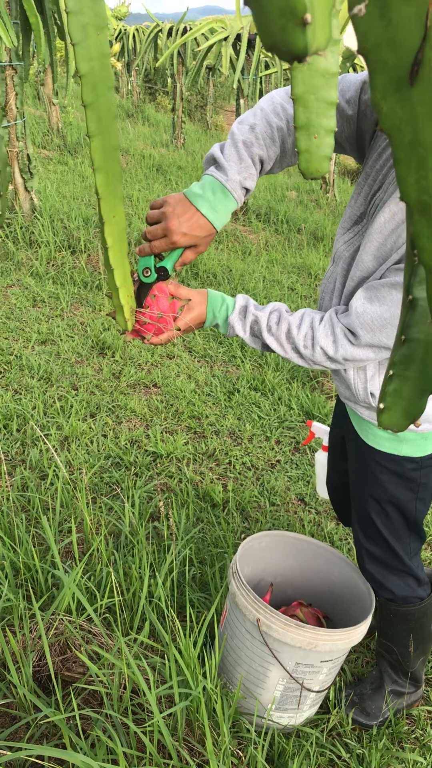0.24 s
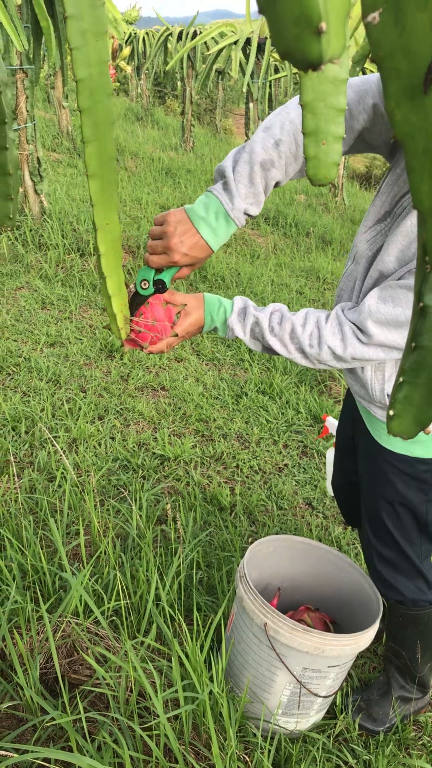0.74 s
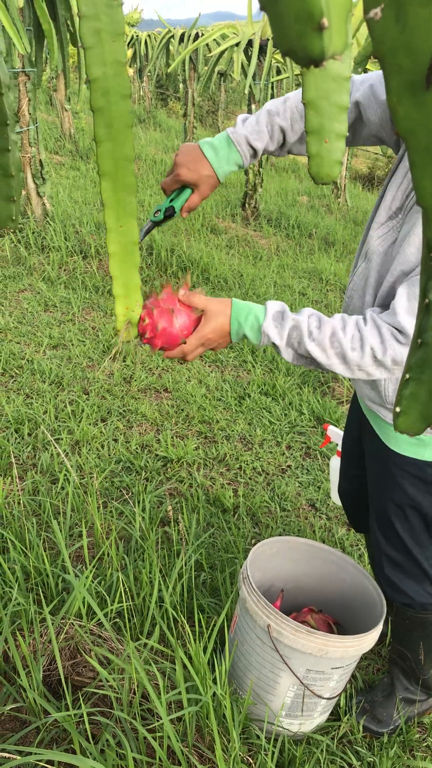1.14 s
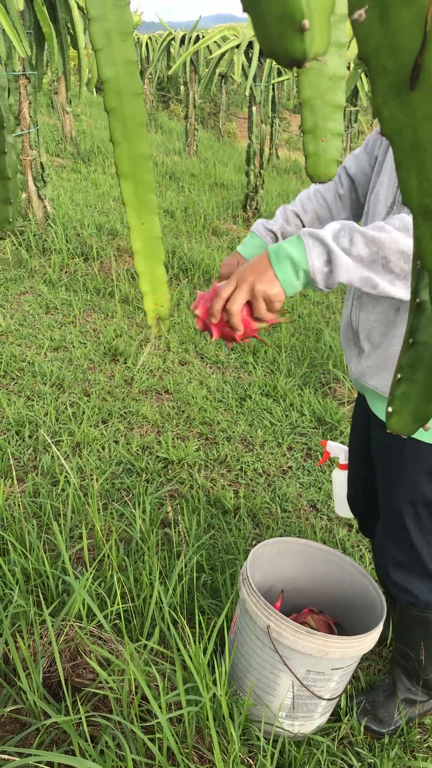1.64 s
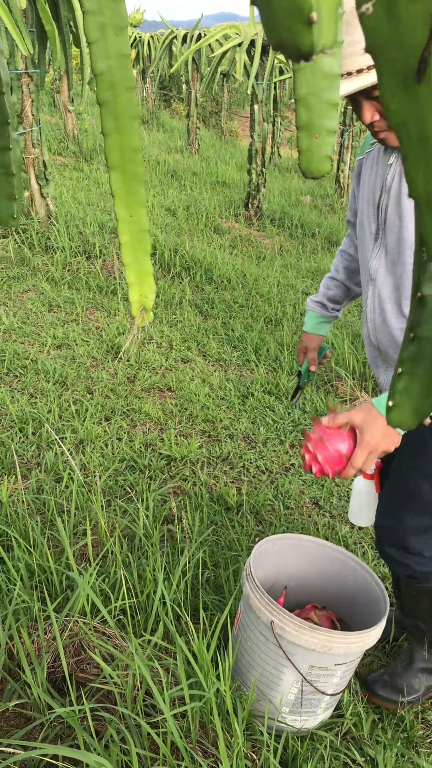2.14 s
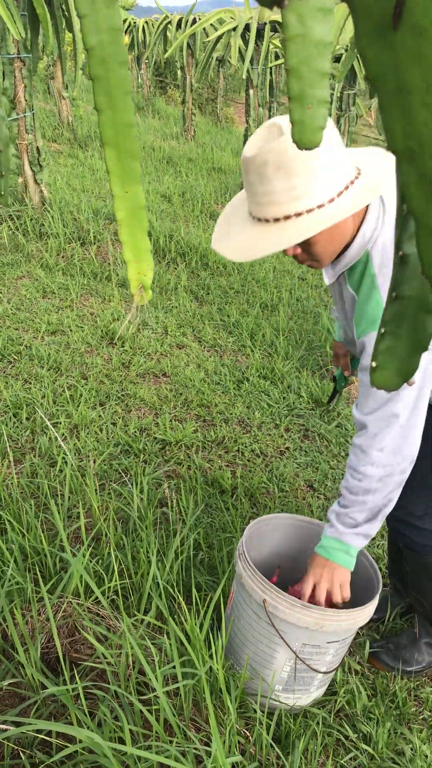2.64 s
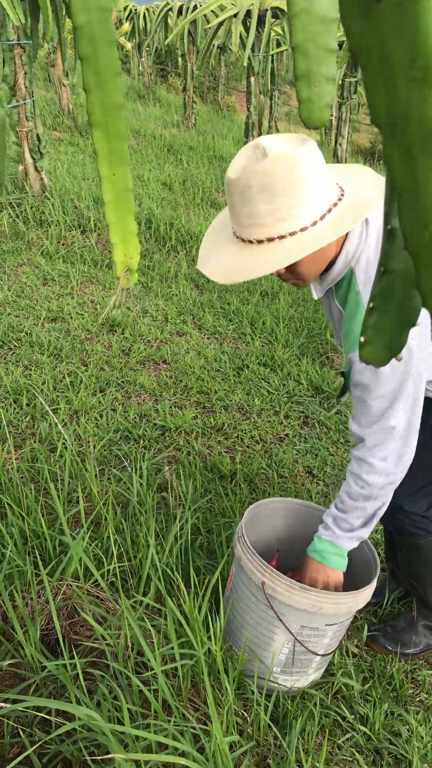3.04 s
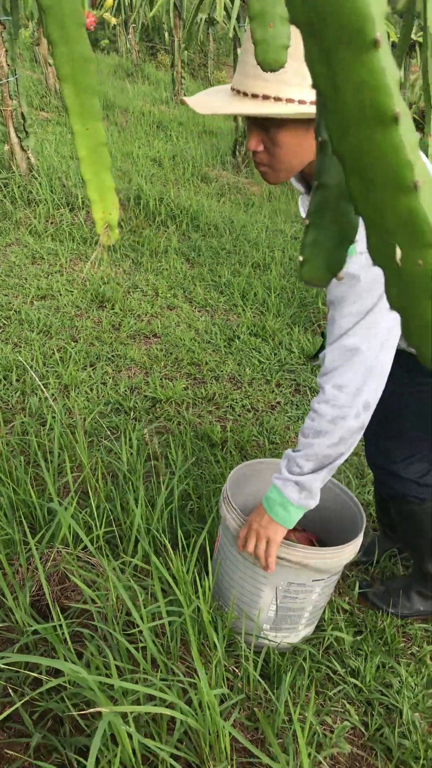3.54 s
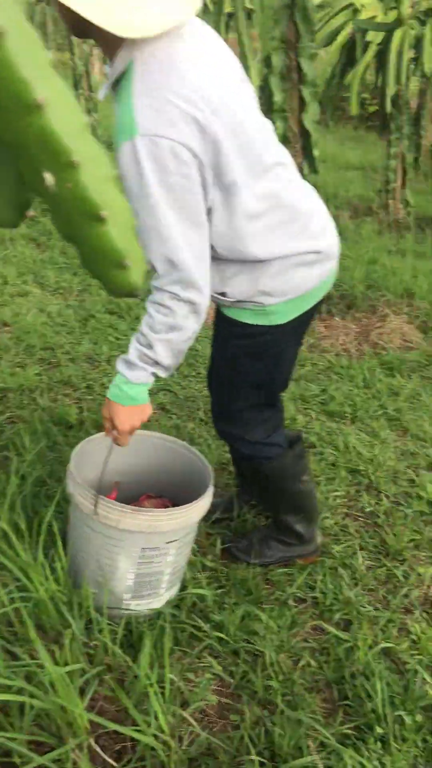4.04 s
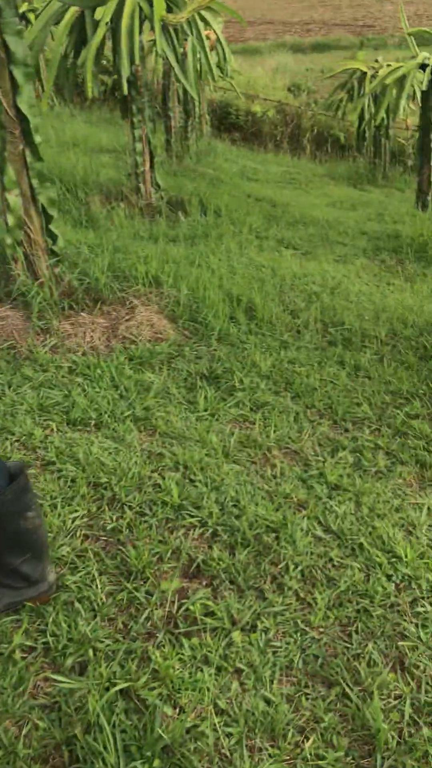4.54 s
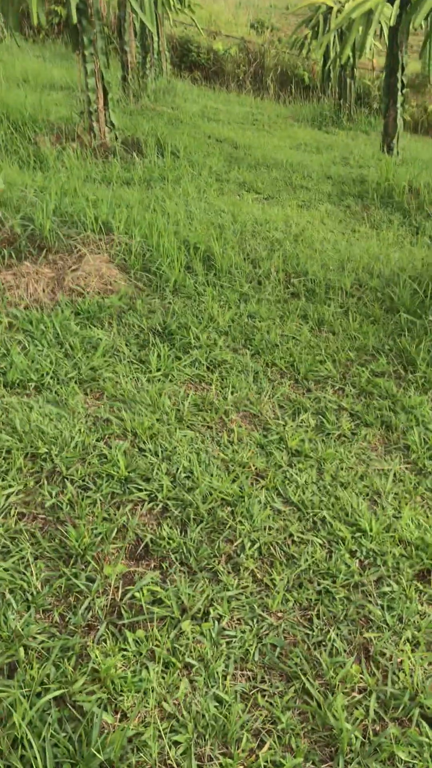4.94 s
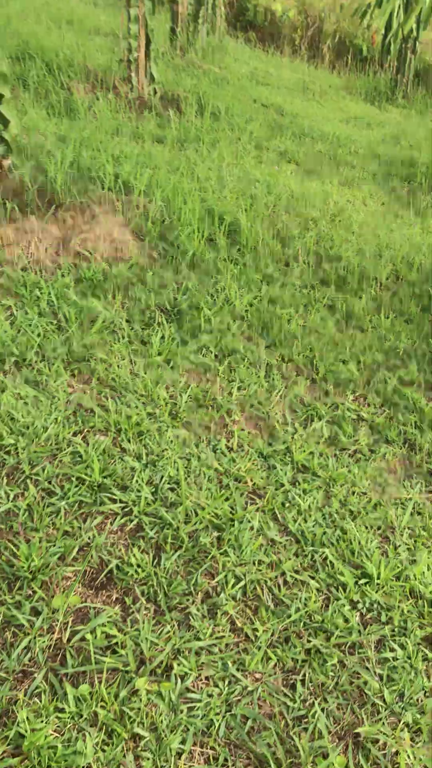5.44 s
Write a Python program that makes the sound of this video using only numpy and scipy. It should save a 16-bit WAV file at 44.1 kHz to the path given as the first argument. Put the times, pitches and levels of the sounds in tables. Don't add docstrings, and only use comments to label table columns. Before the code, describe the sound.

Close, effectively mono outdoor sound: low wind puffs and thin insect buzz, then a crisp snip in two stages. Three bright chirp-and-trill bird calls follow, echoing lightly among plant rows. Small plastic taps and hand rubs come from a bucket, then firmer knocks as it is lifted, a hollow bump against a boot, and growing grass brushing with dry snaps to the end.

```python
import sys
import numpy as np
from scipy import signal
from scipy.fft import rfft, irfft, next_fast_len
from scipy.io import wavfile
from scipy.ndimage import map_coordinates

SR = 44100
rng = np.random.default_rng(int(sys.argv[2]) if len(sys.argv) > 2 else 0)


def voltage_ratio(level):
    return 10 ** (np.asarray(level, float) / 20)


def unload_wav(signal):
    wavfile.write(
        sys.argv[1],
        SR,
        np.round(np.clip(np.atleast_2d(signal).T, -1, 1) * 32767).astype(np.int16),
    )


N = 251350


def unit(x):
    return x / np.sqrt(np.mean(x ** 2) + 1e-20)


def peak(x):
    return x / np.abs(x).max()


def along(points, hz):
    f, v = np.transpose(points)
    return np.interp(np.log(hz + 1), np.log(f + 1), v)


def curves(points):
    s, *cols = np.transpose(points)
    return [np.interp(np.arange(N) / SR, s, c) for c in cols]


def wobble(rate, size=N):
    knots = rng.standard_normal(int(N * rate / SR) + 4)
    return map_coordinates(knots, [np.arange(size) * rate / SR])


def swells(at_s, rise_s, fall_s, db):
    t = np.arange(0, N + 64, 64) / SR
    at_s, rise_s, fall_s, db = (np.reshape(v, (-1, 1)) for v in (at_s, rise_s, fall_s, db))
    late = t - at_s
    slope = np.where(late < 0, -late / rise_s, late / fall_s)
    power = np.sum(voltage_ratio(db - 10 * slope) ** 2, axis=0)
    return np.interp(np.arange(N) / SR, t, np.sqrt(power))


def filtered(x, response):
    m = next_fast_len(len(x) + 8192)
    return irfft(rfft(x, m) * response(np.fft.rfftfreq(m, 1 / SR)), m)[:len(x)]


def resonance(centre_hz, width_hz):
    return lambda f: 1j * f * width_hz / (centre_hz ** 2 - f * f + 1j * f * width_hz)


def hiss(spectrum, grain_db=0):
    white = rng.standard_normal(N) * voltage_ratio(grain_db * wobble(900))
    return unit(filtered(white, lambda hz: voltage_ratio(along(spectrum, hz))))


def burst(t, t60):
    return voltage_ratio(-60 * t / t60) * rng.standard_normal(len(t))


def add(track, s, sound):
    part = track[round(s * SR):][:len(sound)]
    part += sound[:len(part)]


def rows(x, gap, decay):
    # (f/Hz, t60/s)
    row_t60 = [(1000, 0.24), (3000, 0.27), (8000, 0.2)]
    hz, t, z = signal.stft(rng.standard_normal(SR), SR, nperseg=256)
    fading = z * voltage_ratio(-60 * t / (decay * along(row_t60, hz)[:, None]))
    tail = signal.istft(fading, SR, nperseg=256)[1]
    return signal.fftconvolve(np.pad(x, (round(gap * SR), 0)), tail / np.linalg.norm(tail))[:N]


def wind():
    # (t/s, level/dB)
    breeze = [(0, -56), (.62, -59), (.71, -72), (1.0, -65), (2.4, -70), (3.1, -69), (3.4, -62), (4.1, -67),
              (4.4, -60), (5.7, -65)]
    # (t/s, level/dB)
    puffs = [(.14, -47), (.24, -52), (.4, -49), (.54, -56), (.63, -50), (1.05, -60), (1.38, -60),
             (1.63, -54), (1.75, -53), (1.99, -53), (2.12, -60), (2.62, -58), (2.79, -57), (2.93, -54),
             (3.27, -55), (3.36, -57), (3.65, -54), (3.7, -51), (4.05, -60), (4.22, -57), (4.53, -57),
             (5.03, -57), (5.15, -56), (5.3, -58), (5.46, -54), (5.65, -57)]
    # (f/Hz, density/dB)
    rumble = [(15, -44), (25, 1), (68, -2.5), (151, -16.5), (249, -41), (400, -46), (520, -87), (880, -120)]
    # (f/Hz, density/dB)
    air = [(30, -5), (100, 2), (400, -13.5), (1000, -23.5), (3000, -22), (6000, -31), (9500, -43),
           (15500, -35)]
    s, db = np.transpose(puffs)
    pressure = voltage_ratio(curves(breeze)[0]) + swells(s, .03, .045, db)
    return pressure * unit(voltage_ratio(1.4 * wobble(20)) * hiss(rumble)) + voltage_ratio(-67) * hiss(air)


def insects():
    # (t/s, low buzz/dB, high buzz/dB)
    buzz_levels = [(0, -70, -70), (1.2, -69, -68.5), (2.5, -70.5, -69.5), (3.7, -73.5, -68),
                   (4.2, -77, -73), (5.7, -115, -93)]
    t, out = np.arange(N) / SR, 0
    low = lambda f: abs(resonance(7310, 260)(f)) ** 2 + .6 * abs(resonance(7800, 700)(f)) ** 2
    high = lambda f: abs(resonance(10800, 500)(f)) ** 2 + .6 * abs(resonance(11100, 1300)(f)) ** 2
    for db, band, wing_hz, depth_db in zip(curves(buzz_levels), (low, high), (55.7, 125.6), (3, 4.3)):
        beat = voltage_ratio(depth_db * np.sin(2 * np.pi * wing_hz * t + .5 * wobble(1.1)))
        out = out + voltage_ratio(db) * unit(filtered(beat * rng.standard_normal(N), band))
    return out


def whistles(notes, bend, overtone_db, flutter_db, waver):
    out, unsteady = np.zeros(N), 1 + waver * wobble(220)
    for s, length, first_hz, last_hz, db in notes:
        u = np.linspace(0, 1, round(length * SR))
        glide = last_hz + (first_hz - last_hz) * (1 - u) ** bend
        phase = 2 * np.pi * np.cumsum(glide * unsteady[round(s * SR):][:len(u)]) / SR
        soft_ends = np.sqrt(np.abs(np.sin(np.pi * u)))
        add(out, s, voltage_ratio(db) * soft_ends * (np.sin(phase) + voltage_ratio(overtone_db) * np.sin(2 * phase)))
    return out * voltage_ratio(flutter_db * wobble(260))


def far_notes():
    # (t/s, length/s, first f/Hz, last f/Hz, level/dB)
    far_calls = [(0.005, 0.036, 1900, 2450, -68), (.075, 0.017, 2790, 2710, -60),
                 (.135, .035, 2420, 2800, -63), (.168, .066, 2850, 3720, -64),
                 (.152, .015, 3900, 4100, -70.5), (.40, .045, 1130, 1110, -75),
                 (1.555, .025, 3200, 3520, -73), (1.61, 0.029, 2680, 3100, -75),
                 (1.63, .01, 4350, 4170, -68), (1.66, 0.026, 3400, 3600, -69),
                 (2.63, 0.085, 2500, 3730, -68.5), (2.701, 0.022, 2150, 2050, -55.5),
                 (2.724, .014, 2080, 1750, -60), (2.71, .035, 2450, 2750, -68),
                 (2.69, .016, 950, 1000, -70), (2.745, 0.03, 2800, 2720, -67),
                 (2.775, 0.028, 2680, 1800, -65), (2.985, 0.045, 3100, 3100, -66),
                 (3.092, 0.027, 3100, 3100, -69), (3.678, 0.036, 2850, 3330, -61),
                 (.015, .03, 3100, 3200, -71), (.12, .016, 2380, 2300, -68), (.14, .02, 3000, 3600, -74),
                 (.19, .06, 2950, 3000, -74), (.372, .016, 2700, 3900, -69), (.37, .012, 4120, 4000, -70),
                 (.49, .03, 1130, 1110, -76), (1.362, .018, 2750, 2900, -71), (3.495, .03, 3500, 3200, -71),
                 (3.615, .025, 3400, 3500, -68), (3.657, .016, 2550, 2700, -72),
                 (.384, .07, 3950, 3560, -69), (.465, .03, 3400, 2500, -76), (.694, .022, 2600, 4050, -69),
                 (.709, .034, 4050, 4080, -65), (.747, .018, 4100, 4000, -68),
                 (2.703, .018, 3500, 3950, -66), (2.915, .085, 1500, 1480, -74),
                 (2.735, .012, 1050, 950, -69)]
    # (t/s, notes, first level/dB)
    runs = [
        (2.155, 6, -65),
        (2.643, 4, -67),
    ]
    # (t/s, length/s, f/Hz, level/dB)
    thin_notes = [(2.39, .033, 12100, -70), (2.45, .049, 12300, -73), (2.53, .03, 12800, -73),
                  (2.545, .05, 12100, -73)]
    # (t/s, level/dB)
    sharp_notes = [(4.015, -57), (4.098, -56), (4.156, -56)]
    gap_s, note_s, first_hz, top_hz, fall, swell_db = .0155, .009, 2500, 2950, .89, 1.2
    chatter = []
    for s, notes, db in runs:
        for k in range(notes):
            hz = top_hz - (top_hz - first_hz) / 2 ** k
            chatter.append((s + k * gap_s, note_s, hz, hz * fall, db + k * swell_db))
    peeps = [(s, length, hz, hz, db) for s, length, hz, db in thin_notes]
    tsips = [(s, .01, 7800, 6700, db) for s, db in sharp_notes]
    return far_calls + chatter + peeps + tsips


def sung(motif, calls):
    return [(s + delay, length, first * ratio, last * ratio, db + contrast * note_db)
            for s, ratio, db, contrast in calls for delay, length, first, last, note_db in motif]


def birds():
    # (delay/s, length/s, first f/Hz, last f/Hz, level/dB)
    chip = [(0, .009, 2200, 2950, -1), (-.002, .012, 3400, 4300, -12), (.008, .011, 2800, 1950, 0),
            (.017, .017, 1860, 1760, -1.5)]
    drop_motif = [(0, .01, 2620, 2090, 0), (.0105, .014, 1950, 1360, -6)]
    trill = [(0, .009, 2950, 2600, -7), (.0145, .012, 3450, 2850, 0), (.03, .012, 3600, 2900, -1),
             (.045, .011, 3550, 2800, 0), (.055, .012, 2950, 2290, 0)]
    # (t/s, pitch ratio, level/dB, contrast between its notes)
    chip_calls = [(1.047, 1.01, -61, 1.1), (1.318, 1.01, -59, .8)]
    drop_calls = [
        (1.628, .85, -59, -.9),
        (1.944, 1.01, -47, 1.1),
        (2.245, 1.01, -47.5, 1.1),
    ]
    trill_calls = [(1.687, .975, -49, 1.1), (1.998, 1.01, -45.5, 1.2), (2.296, 1.03, -44, .8)]
    # (delay/s, level/dB)
    early_echoes = [(.0037, -6), (.0079, -8.5), (0.031, -14), (.019, -10)]
    song = sung(chip, chip_calls) + sung(drop_motif, drop_calls) + sung(trill, trill_calls)
    near = whistles(song, 1.05, -33, 1.7, .016)
    far = whistles(far_notes(), 1.1, -26, 2.2, .014)
    early = sum(voltage_ratio(db) * np.roll(near, round(delay * SR)) for delay, db in early_echoes)
    scattered = voltage_ratio(-1.5) * rows(near * unit(1 + 1.6 * wobble(520)), .003, decay=.9)
    hillside = voltage_ratio(-19) * rows(near, .037, decay=14.0)
    answer = filtered(early + scattered + hillside, lambda f: resonance(2800, 4400)(f) ** 2)
    far_echo = voltage_ratio(-2.5) * rows(far * unit(1 + 1.2 * wobble(400)), .0022, decay=.9)
    return near + answer + far + far_echo


def friction(strokes):
    out = np.zeros(N)
    for s, length, hz, width_hz, db in strokes:
        stroke = np.hanning(round(length * SR)) ** 0.26
        grit = rng.standard_normal(len(stroke)) * voltage_ratio(4.9 * wobble(165, size=len(stroke)))
        add(out, s, voltage_ratio(db) * stroke * unit(filtered(grit, lambda f: resonance(hz, width_hz)(f) ** 2)))
    return out


def scrapes():
    # (t/s, length/s, f/Hz, width/Hz, level/dB)
    slides = [(0, 0.043, 1310, 1500, -68), (2.925, .045, 620, 200, -66), (2.98, 0.13, 1400, 700, -72),
              (3.08, 0.036, 590, 201, -71), (3.146, 0.17, 1340, 500, -72), (3.388, 0.051, 290, 150, -62.5),
              (3.553, 0.046, 1170, 710, -60.5), (3.675, 0.016, 940, 200, -56), (4.54, 0.18, 252, 70, -68)]
    return friction(slides)


def shears():
    # (t/s, flesh/dB, steel/dB, edge over blade/dB, crumble t60/s)
    snips = [(.6137, -30, -19, -10, .015), (.6152, -36, -29, -8, .015), (.6169, -24, -25, -5, .035),
             (.7684, -40, -18, -17, .012), (.8193, -64, -35, -8, .012), (.8332, -58, -50, 0, .02),
             (.8345, -47, -31, -3, .015), (.8364, -38, -25, -3, .015), (.8383, -28, -28, 2, .012),
             (.8388, -27, -20, 1, .012), (.8404, -14, -19, -1, .02), (.8418, -26, -26, -2, .02),
             (.8431, -29, -25, 5, .012), (.8436, -21, -23, 6, .012), (.8442, -23, -23, -3, .04),
             (1.5102, -38, -35, -4, .035)]
    # (f/Hz, width/Hz, radiation/dB)
    bodies = [
        (1000, 1100, -2),
        (2900, 1300, -3.5),
        (7000, 3000, -6.5),
        (13200, 6000, 1.5),
    ]
    # (f/Hz, level/dB, t60/s)
    palm = [
        (215, -50, .16),
        (380, -41, .07),
    ]
    out, t = np.zeros(N), np.arange(SR // 10) / SR
    soft_onset = 1 - np.exp(-t / .0015)
    for s, flesh_db, steel_db, edge_db, crumble in snips:
        part_db = flesh_db - 22, flesh_db, steel_db, steel_db + edge_db
        crack = voltage_ratio(-60 * t / .002) * np.sign(rng.standard_normal(len(t)))
        fibres = rng.standard_normal(len(t))
        snap = crack + voltage_ratio(-15 - 60 * t / crumble) * fibres
        squash = voltage_ratio(-60 * t / .035) * soft_onset * fibres
        forces = squash, snap, -snap, snap
        for part, db, force, body in zip(("fruit", "stem", "blade", "edge"), part_db, forces, bodies):
            hz, width_hz, radiation_db = body
            if part == "stem" and s < .8:
                hz = hz * .76
            ring = filtered(force, lambda f: resonance(hz, width_hz)(f) * resonance(hz, 2 * width_hz)(f))
            add(out, s, voltage_ratio(db + radiation_db + 3.5) * peak(ring))
    thump = sum(voltage_ratio(db - 60 * t / t60) * np.sin(2 * np.pi * hz * t) for hz, db, t60 in palm)
    add(out, .842, thump * soft_onset * np.cos(5 * np.pi * t))
    return out


def cracks():
    # (t/s, peak/dB, low f/Hz, high f/Hz, t60/s)
    broad_snaps = [(.927, -42, 650, 3000, .016), (2.8505, -54, 2200, 7000, .006), (2.912, -55, 1200, 6000, .008),
                   (2.949, -50, 2200, 7000, .01), (3.007, -50, 900, 2600, .012), (3.037, -52, 900, 4200, .012),
                   (3.1114, -46, 3000, 7500, .01), (3.161, -59, 1100, 1700, .015),
                   (3.181, -57, 1100, 2000, .012), (3.383, -56, 1000, 9000, .006),
                   (3.402, -46, 1900, 3000, .012), (3.4592, -39, 1500, 2700, .016),
                   (3.556, -54, 2000, 3200, .02), (3.574, -52, 2000, 3200, .02), (3.7315, -39, 1200, 2900, .015),
                   (3.75, -44, 3200, 4200, .014), (4.205, -48, 1300, 2700, .02), (4.409, -44, 900, 4600, .01),
                   (4.528, -53, 900, 2000, .01), (4.554, -51, 1000, 3000, .01), (5.218, -46, 1400, 3200, .006),
                   (5.297, -46, 1300, 3000, .01), (5.342, -38, 1300, 3600, .007), (5.41, -46, 900, 2500, .008),
                   (5.466, -45, 1000, 3500, .006), (5.475, -31, 1100, 3300, .01), (5.5, -45, 1200, 3000, .008),
                   (5.63, -44, 2000, 4000, .008), (4.3755, -37, 180, 1700, .045), (2.761, -52, 1200, 4000, .01),
                   (2.93, -53, 1000, 4500, .01), (3.068, -55, 1100, 2500, .01), (3.242, -54, 1200, 3500, .008),
                   (3.265, -52, 2000, 5000, .008), (4.352, -52, 2800, 4200, .01), (.6137, -30, 3400, 5200, .006),
                   (.6169, -28, 3000, 4800, .012), (.846, -37, 2200, 6500, .07), (2.726, -47, 1700, 5500, .012),
                   (4.455, -52, 900, 3500, .008)]
    out, t = np.zeros(N), np.arange(SR // 15) / SR
    for s, db, low_hz, high_hz, t60 in broad_snaps:
        band = signal.butter(3, [low_hz, high_hz], 'bandpass', fs=SR, output='sos')
        add(out, s, voltage_ratio(db) * peak(signal.sosfilt(band, burst(t, t60))))
    return out


def grass():
    # (peak t/s, rise/s per 10 dB, fall/s per 10 dB, level/dB, broad blades/dB)
    brushes = [(.66, .02, .04, -67, -6), (.914, .015, .035, -67, -1), (1.416, .014, .025, -58, -21),
               (1.63, .007, .03, -74, 3), (1.83, .1, .3, -77, -9), (2.06, .2, .15, -69, -6),
               (2.23, .12, .15, -61, -9), (2.34, .1, .06, -65, -8), (2.51, .02, .15, -75, -8),
               (2.73, .02, .12, -67, -2), (2.92, .02, .1, -78, 8), (3.11, .006, .01, -71, 0),
               (3.26, .03, .1, -60, -6), (3.65, .17, .1, -65, -4), (3.72, .04, .17, -51, -7),
               (3.94, .06, .07, -56.5, -5), (4.35, .2, .24, -57, -6), (4.63, .15, .4, -63, -9),
               (4.89, .13, .3, -55, -5), (5.04, .12, .06, -51, -3), (5.19, .2, .06, -50, -8),
               (5.33, .05, .04, -49, -8), (5.55, .12, .15, -44.5, -6)]
    # (t/s, cloth level/dB)
    body_moves = [(0, -80), (.85, -79), (.9, -70), (.97, -79), (1.8, -79), (2.2, -69), (2.5, -80),
                  (2.92, -70), (3.1, -72), (3.26, -68), (3.34, -75), (3.74, -68), (4.05, -73), (4.35, -67),
                  (4.53, -69), (4.58, -62), (4.8, -63), (5.7, -66)]
    # (f/Hz, density/dB)
    fizz_tone = [(5000, -40), (8000, -1.5), (11000, 0.5), (15500, 3)]
    swish_tone = [(1200, -18), (2500, -9), (5000, -4.5), (7500, -5), (11000, -32)]
    cloth_tone = [(150, -5), (350, -7), (700, -7), (1300, -2.5), (2500, -9), (4500, -13.5)]
    s, rise, fall, db, broad_db = np.transpose(brushes)
    fine, broad = swells(s, rise, fall, db), swells(s, rise, fall, db + broad_db)
    stroke = wobble(35)
    fizz = fine * voltage_ratio(2.5 + stroke) * hiss(fizz_tone, grain_db=2)
    swish = broad * voltage_ratio(2.5 + stroke) * hiss(swish_tone, grain_db=2.8)
    moving = voltage_ratio(curves(body_moves)[0]) + voltage_ratio(-16) * broad
    return fizz + swish + moving * voltage_ratio(4.5 + stroke) * hiss(cloth_tone, grain_db=3)


def twigs():
    # (t/s, peak/dB, f/Hz)
    snaps = [(0.9088, -49, 7380), (1.2905, -64, 7350), (1.4164, -58, 7400), (2.3694, -63, 3150),
             (2.3906, -59, 3400), (2.7644, -59, 7760), (2.9118, -57, 10900), (3.1127, -58, 7240),
             (3.693, -39, 9380), (3.717, -37.5, 8300), (4.4045, -42, 3900), (4.4075, -42, 3450),
             (2.706, -56, 4300), (2.713, -56, 3300), (3.385, -56, 3500), (3.407, -50, 1050),
             (4.4444, -38, 13900), (4.5406, -48, 5500), (4.57, -47, 14500), (4.629, -50, 6090),
             (5.1744, -42, 12500), (5.325, -34, 8300), (5.3432, -46, 4200), (5.5394, -38, 7030),
             (5.5927, -42, 4570), (2.968, -57, 2600), (2.995, -57, 1500), (3.135, -58, 2900),
             (3.205, -57, 2400), (.8195, -40, 8000), (4.4092, -44, 2600)]
    out, t = np.zeros(N), np.arange(SR // 40) / SR
    for s, db, hz in snaps:
        add(out, s, voltage_ratio(db + 4.5) * peak(filtered(burst(t, .004), resonance(hz, 0.45 * hz))))
    return out


def bucket():
    # (t/s, peak/dB, deep/dB, click/dB, share of the wall's ring time left by damping)
    knocks = [(0.927, -51, -26, -17, 0.3), (1.51, -44, -25, -18, .3), (2.724, -54, -40, 6, 0.5),
              (2.913, -56, -7, -6, 0.51), (2.949, -53, 3, -7.5, 0.42), (3.006, -51.5, -26, -20, 0.6),
              (3.036, -53, -19, -20, 0.5), (3.402, -44.5, -29, -20, 0.6), (3.418, -58, -10, -8, 0.6),
              (3.459, -40, -22, -28, 0.33), (3.561, -51.5, -22, -10, 0.7), (3.584, -52, -16, -12, 0.7),
              (3.678, -48.5, -28, -22, 0.6), (3.697, -46, -21, -36, 0.5), (3.733, -36, -28, -28, 0.43),
              (4.207, -51, -18, -15, 0.5), (4.367, -52, -15, -27, 0.5), (4.454, -57, -14, -12, 0.48),
              (4.552, -52, -11, -22, 1.1), (5.19, -49, 6, -31, 0.44), (5.42, -53, 6, -25, 0.4),
              (5.463, -46, 8, -25, 0.4)]
    # (f/Hz, level/dB, t60/s)
    wall_modes = [(290, 8, 0.05), (470, -7, .035), (720, 2, 0.09), (950, -9.5, 0.13), (1122, -2.5, 0.052),
                  (1400, -6, 0.078), (1580, -6, 0.047), (2090, -4, 0.045), (2500, 10, 0.025),
                  (3100, -4, 0.017)]
    out, t = np.zeros(N), np.arange(SR // 6) / SR
    for s, db, deep_db, click_db, damping in knocks:
        tilt = [(500, deep_db + 10), (900, 0), (1500, 0), (2200, click_db + 2)]
        contact = burst(t, .022) * (1 - np.exp(-t / .0011))
        wall = 0
        for hz, level, t60 in wall_modes:
            detuned_hz = hz * rng.normal(1, .025)
            ring = voltage_ratio(-60 * t / (t60 * damping)) * np.sin(2 * np.pi * detuned_hz * t)
            wall = wall + voltage_ratio(level + along(tilt, hz)) * peak(signal.fftconvolve(ring, contact)[:len(t)])
        thud = filtered(peak(wall), lambda f: 1 / (1 + 190 / (1j * f + 1)) ** 3)
        slap = peak(filtered(contact, lambda f: resonance(1250, 1300)(f) ** 3))
        tap = peak(filtered(contact, lambda f: resonance(2300, 3000)(f) ** 3))
        add(out, s, voltage_ratio(db) * (thud + voltage_ratio(-3) * slap + voltage_ratio(click_db) * tap))
    return out


def flaps():
    # (t/s, length/s, f/Hz, level/dB)
    gusts = [
        (2.595, .05, 62, -49),
        (3.624, .056, 58, -40.5),
    ]
    out = np.zeros(N)
    for s, length, hz, db in gusts:
        t = np.arange(round(length * SR)) / SR
        add(out, s, voltage_ratio(db) * np.sqrt(np.sin(np.pi * t / length)) * np.sin(2 * np.pi * hz * t))
    return out


def rubs():
    # (t/s, length/s, f/Hz, width/Hz, level/dB)
    contacts = [(2.972, .065, 640, 40, -67), (3.41, .025, 1300, 900, -66), (5.455, .02, 350, 300, -56),
                (3.22, .06, 1350, 300, -67), (3.555, .045, 2500, 900, -67), (3.735, .022, 1300, 500, -55),
                (4.56, .11, 1450, 800, -61), (4.62, .04, 640, 150, -61), (4.85, .05, 1350, 300, -63),
                (4.94, .06, 1300, 400, -63), (5.15, .05, 600, 700, -62), (5.185, .016, 650, 300, -56),
                (5.3, .04, 1700, 500, -60), (5.4, .05, 350, 300, -62), (5.5, .12, 900, 900, -63),
                (5.6, .09, 3500, 2500, -58), (3.695, .022, 950, 300, -57), (4.21, .03, 450, 250, -64)]
    return friction(contacts)


def bump():
    # (f/Hz, level/dB, t60/s)
    free_wall = [(275, -1, .04), (420, -4, .028), (560, -7, .025), (684, -5, .07), (877, -1, .03),
                 (1010, -3, .03), (1125, 1, .04), (1997, -18, .03)]
    rim = [(1550, 1, .016), (2600, -9, .014), (2900, -7, .016), (3900, -20, .01)]
    out, t = np.zeros(N), np.arange(SR // 6) / SR
    ring = lambda modes: sum(voltage_ratio(db - 60 * t / t60) * np.sin(2 * np.pi * hz * t) for hz, db, t60 in modes)
    click = voltage_ratio(5) * (1 - np.exp(-t / .0005)) * ring(rim)
    boom = voltage_ratio(4) * (1 - np.exp(-t / .0016)) ** 2 * ring(free_wall)
    add(out, 4.3737, voltage_ratio(-32.5) * (click + boom) * voltage_ratio(1.2 * wobble(400, size=len(t))))
    return out


def scene():
    hits = shears() + bucket() + twigs() + scrapes()
    carried = cracks() + bump() + rubs()
    mono = birds() + grass() + insects() + wind() + flaps()
    for work in (hits, carried):
        mono = mono + work + voltage_ratio(-18 if work is carried else -20.5) * rows(work, .006, decay=0.48)
    return np.array([mono, mono])


def roll_off(x):
    return signal.sosfilt(signal.butter(12, 16800, fs=SR, output="sos"), x)


def record(dry):
    mono = filtered(dry[0], lambda hz: np.clip((16000 - hz) / 300, 0, 1) / (1 + (38 / (hz + 1)) ** 6))
    return roll_off(np.array([mono, mono]))


dry = scene()
out = record(dry)
unload_wav(out)
```